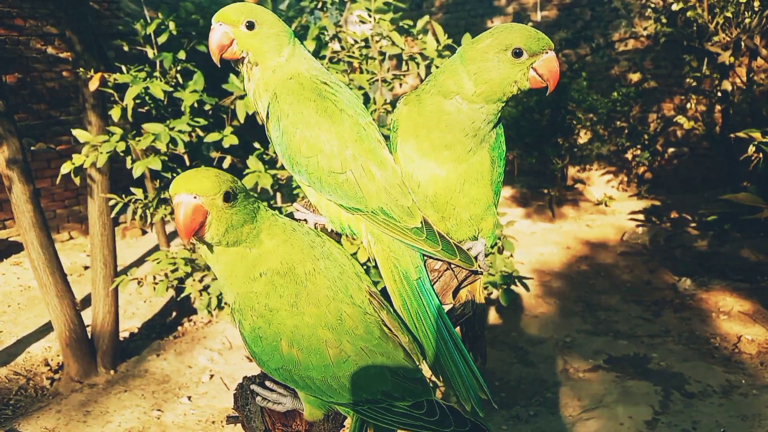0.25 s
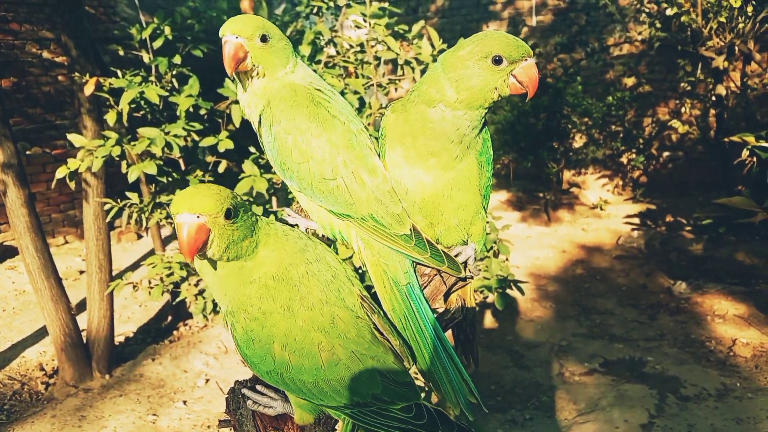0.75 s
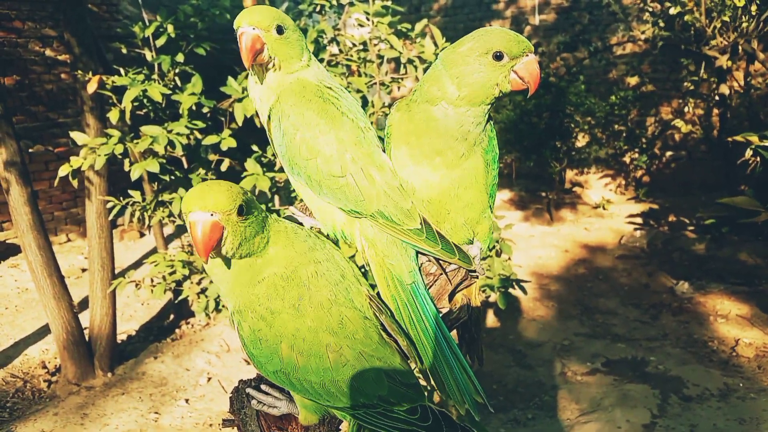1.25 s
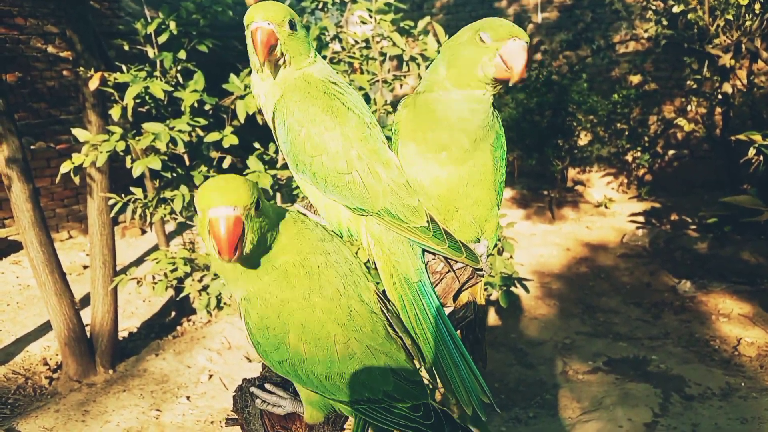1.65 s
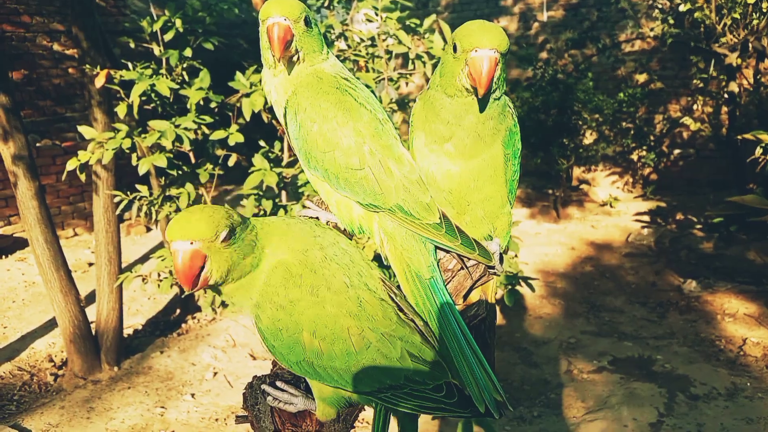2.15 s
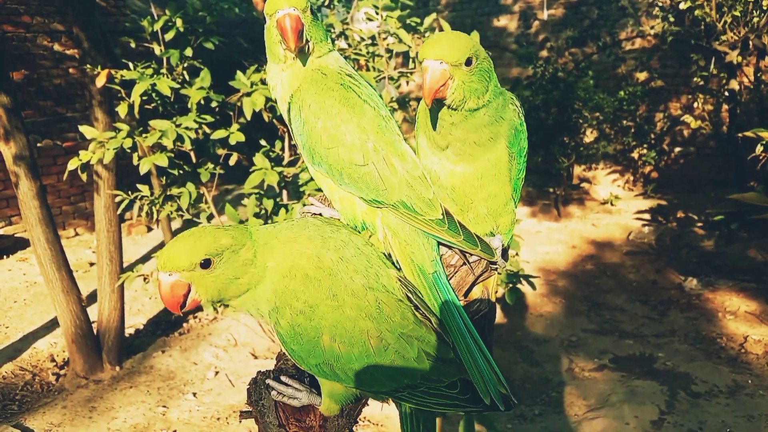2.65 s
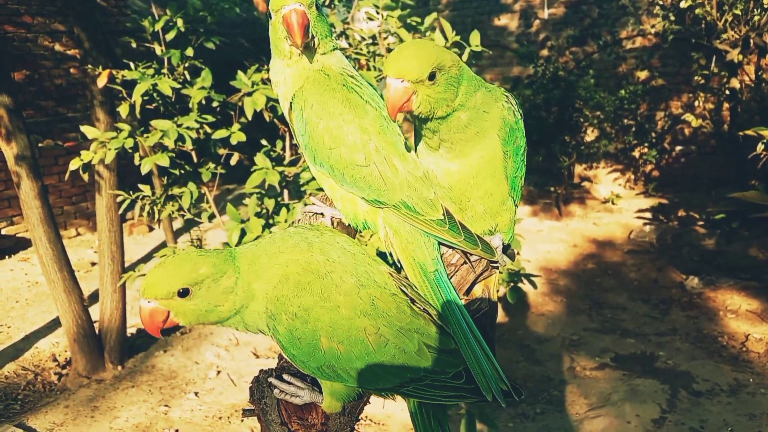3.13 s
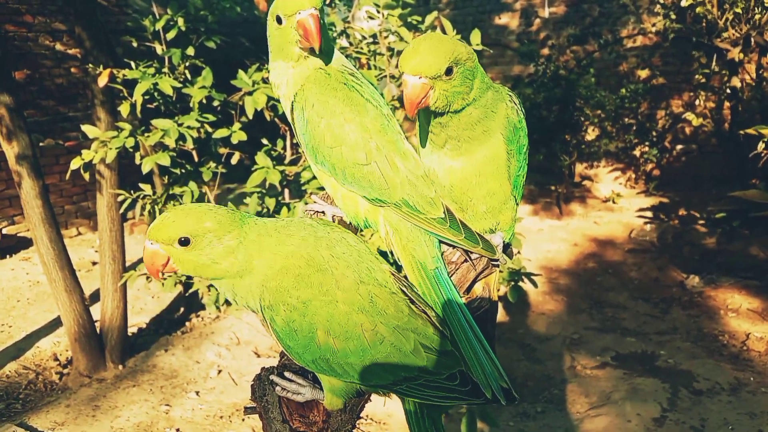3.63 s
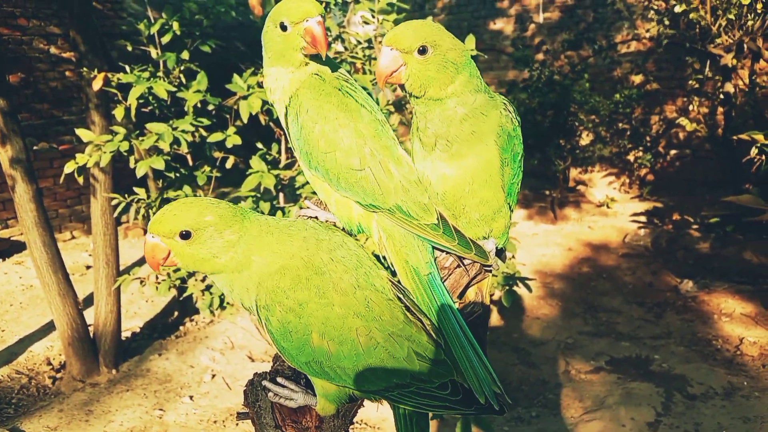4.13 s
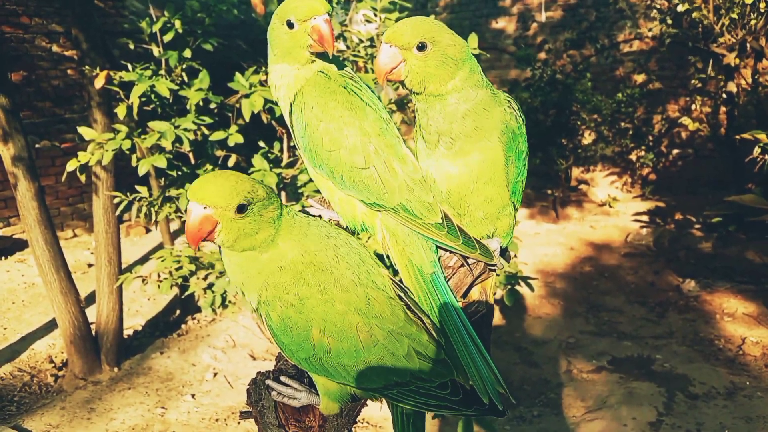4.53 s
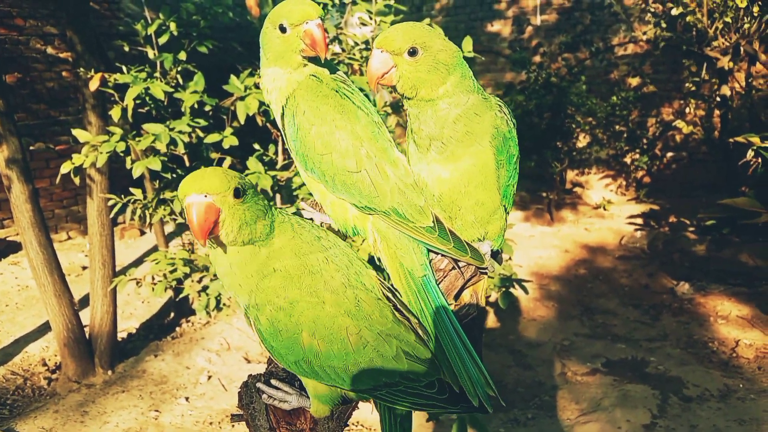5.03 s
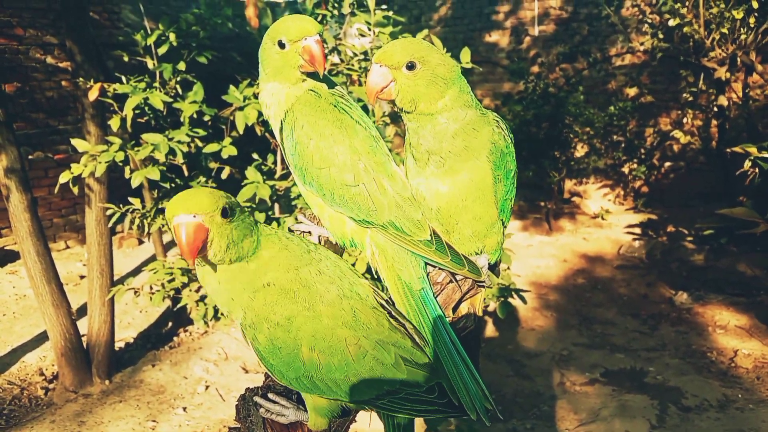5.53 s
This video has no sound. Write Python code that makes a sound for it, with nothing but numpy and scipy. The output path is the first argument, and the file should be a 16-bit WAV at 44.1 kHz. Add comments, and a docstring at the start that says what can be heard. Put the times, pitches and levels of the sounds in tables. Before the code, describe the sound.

Shrill repeated parakeet squawks ring out nearby in a quiet garden, with soft far-off chirps, whistles and two crow caws.

```python
"""A low town rumble and the hum of a distant bird roost fill a walled garden from the start.
Far off, small birds twitter, whistle and chirp in gliding tones, and a crow gives two rattling caws.
A parakeet close by makes six shrill calls: each opens with a fast upward sweep and falls slowly.
Its voice is a stack of overtones, shaped by a throat that rings differently as the beak opens.
Walls and leaves scatter short echoes of the birds."""
import sys
import numpy as np
from scipy import signal
from scipy.fft import rfft, irfft, next_fast_len
from scipy.io import wavfile

SR = 44100
rng = np.random.default_rng(int(sys.argv[2]) if len(sys.argv) > 2 else 0)


def wrap_up_sound(samples):
    """Save the sound to the file named by the first command line argument, as 16-bit audio."""
    columns = np.atleast_2d(samples).T
    # keep every value between -1 and 1, then stretch to whole-number steps
    tamed = np.clip(columns, -1, 1)
    steps = np.round(tamed * 32767).astype(np.int16)
    wavfile.write(sys.argv[1], SR, steps)


N = 254898

CUTOFF_HZ = 15570   # the top of the sound's range
FLUTTER_DB = 3.5   # far notes break up on their way through the leaves
BREAK_HZ = 1703   # the parakeet's falling pitch pauses here and its voice breaks


def from_db(db):
    """Turn decibels into a factor to multiply a sound by."""
    return 10 ** (np.asarray(db) / 20)


def rms_one(x):
    """Scale a signal to an average strength (rms) of 1."""
    return x / np.sqrt(np.mean(x ** 2) + 1e-20)


def span(rows):
    """The samples that rows of (time, values...) cover, and each value filled in between the rows."""
    times, *columns = np.transpose(rows)
    at = np.arange(int(times[0] * SR), min(N, int(times[-1] * SR)))
    return at, [np.interp(at / SR, times, column) for column in columns]


def at_hz(points, hz):
    """Read the level at any frequency from rows of (frequency [Hz], level [dB])."""
    frequencies, levels = np.transpose(points)
    return np.interp(np.log(hz + 1), np.log(frequencies), levels)


def drift(rate_hz):
    """A smooth random wander of typical size 1; a higher rate wanders faster."""
    r = np.exp(-2 * np.pi * rate_hz / SR)
    return rms_one(signal.lfilter([1], [1, -2 * r, r * r], rng.standard_normal(N + SR))[SR:])


def phase_of(hz):
    """Add up a changing pitch into the angle of its wave."""
    return np.cumsum(2 * np.pi * hz / SR)


def filtered(x, kind, hz, order=2):
    """Keep the "low" part, the "high" part or one "band" of a sound."""
    return signal.sosfilt(signal.butter(order, hz, kind, fs=SR, output="sos"), x)


def resonances(modes, hz):
    """How a throat boosts and delays each frequency: peaks where it rings, valleys between."""
    return sum(from_db(db) / (1 + 2j * (hz - centre) / width) for centre, width, db in modes)


def shaped_noise(spectrum):
    """Noise with a chosen level at each frequency."""
    size = next_fast_len(N + SR)
    gain = from_db(at_hz(spectrum, np.arange(size // 2 + 1) * SR / size))
    return irfft(rfft(rng.standard_normal(N), size) * gain, size)[:N]


def tone(start, end, hz, db, waver):
    """One soft wavering tone that swells and fades."""
    out = np.zeros(N)
    at, (progress,) = span([(start, 0), (end, 1)])
    out[at] = from_db(db) * np.sin(np.pi * progress) ** .5 * np.sin(phase_of(hz * (1 + .014 * waver[at])))
    return out


def background():
    """The town's rumble and low hum swell and sink together, under the sound of the roost."""
    # how loud the background is: (time [s], rumble level [dB], roost level [dB])
    levels = [(0, -73.5, -75), (.4, -65, -69.5), (1.2, -72.5, -71), (2.98, -68, -63), (3.03, -74, -77.5),
              (3.6, -71, -76), (3.95, -64.5, -65.5), (4.25, -74.5, -71.5), (4.6, -65.5, -68.5),
              (4.8, -72.5, -77.5), (5.78, -71.5, -65.5)]
    # the deep colour of the rumble: (frequency [Hz], level [dB])
    rumble_spectrum = [(30, -31), (60, -5), (110, 4), (200, -4), (340, -4), (600, -30.5), (2500, -75.5)]
    # wavering hum tones: (pitch [Hz], level [dB])
    hum_tones = [(114, -77.5), (285, -82.5)]
    at, (rumble_db, roost_db) = span(levels)
    swell = from_db(2.8 * drift(5))
    rumble = rms_one(shaped_noise(rumble_spectrum))
    hum = sum(from_db(db + drift(8)) * np.sin(phase_of(hz * (1 + .066 * drift(14))))
              for hz, db in hum_tones)
    roost = roost_chatter() + from_db(-4) * roost_chorus(count=140)
    out = hum * swell
    out[at] += from_db(rumble_db) * (swell * rumble)[at] + from_db(roost_db) * roost[at]
    return out


def roost_chatter():
    """Many distant birds blur into noise; each band of it swells and sinks alone."""
    # the colour of the chatter: (frequency [Hz], level [dB])
    spectrum = [(600, -6), (1130, -6.5), (1270, 6), (1420, -7.5), (2200, -3.5), (2800, -14.5),
                (4200, -18.5), (5300, -14.5), (6500, -34.5), (7200, -70)]
    noise = shaped_noise(spectrum)
    edges_hz = 500 * 2 ** np.arange(0, 4, 1 / 3)   # three bands to an octave
    out = filtered(noise, "high", edges_hz[-1])
    for low, high in zip(edges_hz, edges_hz[1:]):
        out += from_db(3 * drift(7.1)) * filtered(noise, "band", [low, high])
    return rms_one(out)


def roost_chorus(count):
    """Distant birds sing short overlapping tones at random times and pitches."""
    out, waver = np.zeros(N), 2 * drift(45)
    for when, length, pitch, loudness in rng.random((count, 4)):
        start = N / SR * when
        out += tone(start, start + .08 + .2 * length, hz=950 * 2.5 ** pitch, db=9 * loudness, waver=waver)
    return rms_one(out)


def twitters():
    """Far birds sing quick arches: the pitch leaps up, rounds over and drops, loudest at the top."""
    # runs of arches: (start [s], end [s], top pitch at start [Hz], top pitch at end [Hz],
    # arch depth [Hz], arches [per s], level [dB])
    runs = [(0.134, 0.201, 5416, 5370, 1976, 22.1, -60), (0.467, 0.574, 5143, 4170, 904, 48, -62),
            (3.914, 3.995, 5267, 4021, 1052, 49, -57.5), (4.3, 4.502, 5500, 4985, 1903, 34.5, -60.5)]
    hoarse_hz = 143.8   # how far a fast shake moves the pitch
    out, shake, uneven = np.zeros(N), drift(378), drift(16.16)
    for start, end, from_hz, to_hz, depth_hz, rate, db in runs:
        at, (top_hz, progress) = span([(start, from_hz, 0), (end, to_hz, 1)])
        arch = np.abs(np.sin(phase_of(rate * (1 + .077 * uneven[at])) / 2))
        phase = phase_of(top_hz - depth_hz * (1 - arch) + hoarse_hz * shake[at])
        out[at] += from_db(db) * np.sin(np.pi * progress) ** .333 * arch ** .665 * np.sin(phase)
    return out * from_db(FLUTTER_DB * drift(35))


def whistles_and_chirps():
    """Far birds glide from one pitch to another; a fast shake of the pitch makes them hoarse."""
    # two-note whistles, a short high lead-in and a falling glide: (glide start [s], length [s],
    # top pitch [Hz], level [dB], octave above against the glide [dB], lead-in level [dB], its end [Hz])
    whistles = [(0.279, 0.0736, 3506, -52.5, -27.5, -66, 3820),
                (0.927, 0.1297, 3768, -50, -26.5, -59, 4296), (1.316, 0.0805, 4035, -54, -53, -63, 4643),
                (3.455, 0.1152, 3716, -59.5, -17.5, -67.5, 4670), (4.607, 0.11, 3748, -55, -5, -54, 4700),
                (5.056, 0.0855, 3842, -67.5, -3, -70, 4978)]
    # single chirps: (start [s], end [s], start pitch [Hz], end pitch [Hz], level [dB], hoarseness [Hz])
    chirps = [(4.703, 4.757, 2741, 2254, -59.5, 261), (2.948, 3.007, 5426, 6314, -54, 603),
              (3.324, 3.384, 2877, 3178, -64, 250), (3.775, 3.837, 5455, 5824, -48.5, 455),
              (4.101, 4.196, 2670, 2511, -69.5, 59.74), (4.303, 4.361, 5566, 3028, -58, 101),
              (4.357, 4.444, 5170, 4983, -65.5, 440), (4.417, 4.473, 2600, 4310, -60.5, 300),
              (4.532, 4.603, 4530, 6470, -49, 390), (4.944, 4.974, 2230, 3639, -69.5, 150),
              (5.515, 5.588, 5735, 5140, -65, 588), (5.57, 5.63, 4846, 6536, -49.5, 251)]
    lead_s, lead_from_hz, lead_hoarse_hz = .052, 5250, 120
    glide_end_hz, glide_hoarse_hz, waver_hz = 2600, 85, 46
    glide_kink = .55   # the glide drops, lingers midway and drops again; the lead-in does the opposite
    out, shake, waver = np.zeros(N), 1.2 * np.tanh(drift(440) / 1.7), drift(43)
    notes = [(*chirp, 0, 0) for chirp in chirps]   # chirps have no octave and no kink
    for start, length, top_hz, db, octave_db, lead_db, lead_hz in whistles:
        lead = (start - lead_s, start, lead_from_hz, lead_hz, lead_db, lead_hoarse_hz, 0, -glide_kink)
        glide = (start, start + length, top_hz, glide_end_hz, db, glide_hoarse_hz)
        notes += [lead, (*glide, from_db(octave_db), glide_kink)]
    for start, end, from_hz, to_hz, db, hoarse_hz, octave, kink in notes:
        at, (progress,) = span([(start, 0), (end, 1)])
        hz = from_hz + (to_hz - from_hz) * (progress + kink * np.sin(2 * np.pi * progress) / (2 * np.pi))
        phase = phase_of(hz + hoarse_hz * shake[at] + waver_hz * waver[at])
        voice = np.sin(phase) + octave * np.sin(2 * phase)
        out[at] += from_db(db) * np.sin(np.pi * progress) ** .5 * voice
    return out * from_db(FLUTTER_DB * drift(29))


def crow():
    """A shaky voice, uneven from one vibration to the next, rings in the crow's throat."""
    # the caws: (start [s], length [s], top pitch [Hz], level [dB])
    caws = [(0.375, 0.275, 505.9, -49), (3.711, 0.3, 501.8, -48.5)]
    # the course of a caw: (time [share of length], pitch [share of top], level [dB], upper ring [Hz])
    shape = [(0, .96, -16.5, 1897), (.08, 0.932, -3, 2086), (0.381, 1, 1, 2003), (.55, 0.869, -2.5, 2173),
             (0.749, .82, -2, 1988), (0.998, 0.546, -18.5, 1683)]
    # where the throat always rings, before sharpening: (frequency [Hz], width [Hz], level [dB])
    lower_rings = [(895, 187, 14), (1579.5, 690, 28)]
    upper_width_hz, upper_db, rattle_hz = 156, 22.5, 98.7
    out, jitter, rasp = np.zeros(N), drift(81.6), drift(160)
    for start, length, top_hz, top_db in caws:
        course = [(start + length * x, top_hz * pitch, top_db + db, up, x) for x, pitch, db, up in shape]
        at, (hz, db, upper_hz, progress) = span(course)
        throat = lower_rings + [(upper_hz, upper_width_hz, upper_db)]
        rattle_depth = .536 * np.clip(2 - 4 * progress, 0, 1)   # only the first half rattles
        rattle = 1 + rattle_depth * np.sin(2 * np.pi * rattle_hz * at / SR + jitter[at])
        phase = phase_of(hz * (1 + .022 * jitter[at]))
        # cubing sharpens the throat's peaks; weaker tones lie halfway between the overtones
        voice = sum((resonances(throat, k * hz) ** 3 * np.exp(1j * k * phase)).real
                    * (.25 if k % 1 else 1) for k in np.arange(1.5, 6.5, .5))
        out[at] += from_db(db + .54 * rasp[at]) * rattle * rms_one(voice)
    return out


def call_shape(start, sweep_db, top_s, top_hz, catch_s, catch_db, full_s, full_hz, midway_hz,
               break_s, pause_s, held_db, late_db, late_hz, end_s):
    """One parakeet call: it growls low, sweeps up, catches, jumps to full voice, falls and breaks."""
    # the call hooks down and collapses: (time before the end [s], pitch [share of late pitch],
    # level against late level [dB])
    ending = [(.03, 0.9745, 2), (0.017, .94, -2.5), (0.0054, .81, -6), (0, 0.7, -29.5)]
    growl_hz, lift_s, lift_hz = 548.4, .0092, 661.4
    midway_s, jump_s = (full_s + break_s) / 2, max(catch_s, full_s - .018)
    recover_db_per_s = 144   # the voice creeps back after the catch
    pitch = [(0, growl_hz), (lift_s, lift_hz), ((lift_s + top_s) / 2, lift_hz + .55 * (top_hz - lift_hz)),
             (top_s, top_hz), (full_s, full_hz), (midway_s, midway_hz),
             (break_s - pause_s, BREAK_HZ), (break_s + pause_s, BREAK_HZ)]
    pitch += [(end_s - early, late_hz * share) for early, share, _ in ending]
    effort = [(0, sweep_db - 7.5), (.0035, sweep_db - 6), (lift_s, sweep_db - 2.5),
              (catch_s - .005, sweep_db), (catch_s, catch_db),
              (jump_s, catch_db + recover_db_per_s * (jump_s - catch_s)),
              (full_s, held_db + 4), (midway_s, held_db)]
    effort += [(end_s - early, late_db + db) for early, _, db in ending]
    at, (t,) = span([(start, 0), (start + end_s, end_s)])
    # at the break every second vibration weakens, adding tones halfway between the overtones
    halfway_gain = from_db(-13) * np.exp(-((t - break_s) / pause_s) ** 4)
    return at, np.interp(t, *np.transpose(pitch)), np.interp(t, *np.transpose(effort)), halfway_gain


def parakeet():
    """The voice box's overtones pass through a throat that changes as the beak opens, then echo."""
    # the calls, later times counted from each start: (start [s], sweep level [dB], top [s],
    # top pitch [Hz], catch [s], catch level [dB], full voice [s], its pitch [Hz],
    # pitch midway to the break [Hz], break [s], half the pause there [s], held level [dB],
    # late level [dB], late pitch [Hz], end [s], shrillness [dB per overtone], echo delay [ms])
    calls = [(1.407, -20, 0.0229, 2114, 0.0262, -32.5, 0.0725, 1990, 1810, 0.1573, 0.00594, -21, -23, 1519, 0.2321, 1.5, 0.6916),
             (1.742, -19.5, 0.02368, 1982, 0.026, -26.5, 0.0375, 1841, 1793, 0.087, 0.00622, -18, -21.5, 1582, 0.1707, -0.11, 0.4508),
             (2.024, -20, 0.02404, 2037, 0.028, -27, .037, 1932, 1783, .093, 0.011, -19, -20, 1626, 0.17307, 0.35, 0.4507),
             (2.32, -20, 0.02725, 2145, 0.044, -35, .049, 1985, 1790, .099, 0.0019, -17.5, -23.5, 1553, 0.1701, 1.4242, 0.433),
             (2.630, -19.5, .027, 2208, .039, -26.5, 0.057, 1906, 1825, .093, 0.0049, -17.5, -23.5, 1555, 0.18, -0.23, 0.4396),
             (5.668, -22.5, 0.0425, 2286, 0.0366, -27.5, 0.0651, 2287, 1996, 0.1279, 0.00654, -20, -50.5, 1560, 0.2, 0.5, 0.4186)]
    # where the throat rings with the beak open: (frequency [Hz], width [Hz], level [dB])
    open_rings = [(1817.6, 180, -4), (3509.8, 1000, 2), (5148, 650, 2.5), (8240, 1200, -5),
                  (11730, 3500, -7.5)]
    # its lower rings with the beak nearly shut: (frequency [Hz], width [Hz], level [dB])
    shut_rings = [(1500, 1800, 0), (2449, 480, 5.5), (3120, 220, -1), (5370, 470, 1.5)]
    # how strongly the microphone picks up the call: (frequency [Hz], level [dB])
    microphone = [(330, -46.5), (500, -10.5), (1000, -3.5), (2000, 4.5), (5500, -7), (6400, -4.5),
                  (7100, -21.5), (12400, -36.5), (13400, -49.5), (15500, -49.5)]
    shut_hz, open_hz = 1400, 1980   # the beak opens while the sweep passes between these pitches
    attack_s, pure_above_hz, dull_below_hz = .0035, 1950, 1550
    echo_db, echo_above_hz = -.5, 5000   # a small surface close by reflects mainly the highs
    out, jitter, shimmer = np.zeros(N), drift(150), drift(52)
    wobble, rasp = drift(33), drift(400)
    for *call, shrill_db, echo_ms in calls:
        at, hz, effort_db, halfway_gain = call_shape(*call)
        hz = hz * (1 + .0054 * wobble[at])
        opened = np.clip((np.maximum.accumulate(hz) - shut_hz) / (open_hz - shut_hz), 0, 1)
        tilt_db = opened * (shrill_db - .012 * np.maximum(dull_below_hz - hz, 0))
        purity_db = -6.5 * np.clip((hz / pure_above_hz - 1) * 10, 0, 1)   # overtones sink on high notes
        soft_db = .5 * opened * (effort_db - effort_db.max())   # a soft voice is duller
        thin_db = -.0072 * opened * np.clip(BREAK_HZ - hz, 0, 150)   # the main tone thins below the break
        unsteady = .003 + .018 * (1 - opened)   # the sweep is rougher than the held note
        phase = phase_of(hz * (1 + unsteady * jitter[at]))
        fade_in = np.minimum((at - at[0]) / SR / attack_s, 1)
        for k in [*np.arange(.5, 5, .5), *np.arange(5., 26)]:   # multiples of the pitch
            tone_hz = k * hz
            shifted = (at + int(k * SR / 9)) % N   # so that each tone flutters in its own way
            source = fade_in * (hz / open_rings[0][0]) ** .56 * k ** -.15
            if k % 1:
                source *= halfway_gain * from_db(-11 * abs(k - 1.5))
            if k > 3:
                source *= 1 + from_db(-11) * rasp[shifted]   # swirling air roughens the high overtones
            flutter_db = .7 * min(k - .5, 7) * shimmer[shifted]
            colour_db = np.clip((k - 1) * 1.2, 0, 1) * purity_db + max(k - 3, 0) * tilt_db
            colour_db += (k > 2) * soft_db + (k == 1) * thin_db
            throat = opened * resonances(open_rings, tone_hz)
            throat += (1 - opened) * resonances(shut_rings + open_rings[3:], tone_hz)
            delay = np.exp(-2j * np.pi * tone_hz * echo_ms / 1000)
            echo = from_db(echo_db) * delay / (1 - 1j * echo_above_hz / tone_hz)
            wave = np.sqrt(2) * (throat * (1 + echo) * np.exp(1j * k * phase)).real
            pickup = (tone_hz < CUTOFF_HZ) * from_db(at_hz(microphone, tone_hz))
            out[at] += from_db(effort_db + flutter_db + colour_db) * source * pickup * wave
    return out


def held_tones():
    """A few far voices stand out from the roost, each holding one pitch."""
    # faint held notes: (start [s], end [s], pitch [Hz], level [dB])
    notes = [(1.762, 2.045, 1059, -58), (2.277, 2.413, 956, -50.5), (2.44, 2.662, 483.7, -61),
             (4.35, 4.573, 823, -64.5), (4.479, 4.625, 2193, -64), (5.557, 5.69, 2420, -63)]
    waver = drift(25)
    return sum(tone(*note, waver) for note in notes)


def echoes(x, decay_s, first_s):
    """Walls and leaves scatter a sound into echoes that fall by 60 dB in decay_s."""
    t = np.arange(SR) / SR
    scatter = rng.standard_normal(SR) * from_db(-60 * t / decay_s) * (t > first_s)
    return signal.fftconvolve(x, scatter / np.sqrt(np.sum(scatter ** 2)))[:N]


def scene():
    """The near bird has a short bright echo and a faint, dull tail; far birds are half lost in echoes."""
    near = parakeet()
    far = whistles_and_chirps() + twitters() + crow() + held_tones()
    walls = filtered(echoes(near, decay_s=.41, first_s=.014), "low", hz=4500, order=1)
    leaves = filtered(echoes(near, decay_s=.08, first_s=.0043), "high", hz=4000)
    far_echoes = echoes(far, decay_s=.27, first_s=.0017)
    all_echoes = from_db(-20.5) * walls + from_db(-14.5) * leaves + from_db(-2.5) * far_echoes
    dip_start_s, dip_length_s, dip_db = 3.005, .13, -14   # the echoes dip briefly
    since = np.arange(N) / SR - dip_start_s
    all_echoes *= from_db(dip_db * (since > 0) * (since < dip_length_s))
    return (near + far + all_echoes + background())[None]


def record(dry):
    """The microphone adds a steady faint hiss, and the highest treble is cut off."""
    hiss = from_db(-90) * filtered(rng.standard_normal(N), "high", hz=6000)
    return signal.sosfilt(signal.cheby2(24, 60, CUTOFF_HZ, fs=SR, output="sos"), dry + hiss)


dry = scene()
out = record(dry)
wrap_up_sound(out)
```